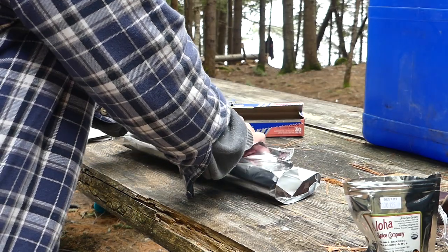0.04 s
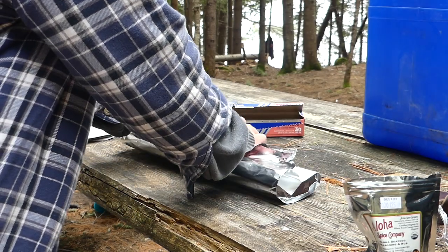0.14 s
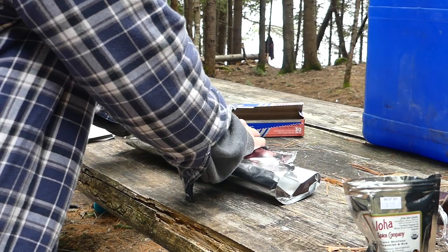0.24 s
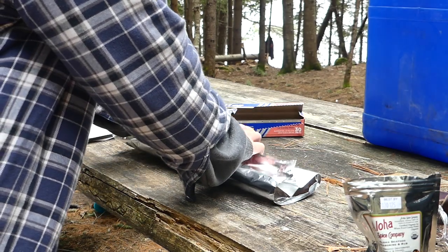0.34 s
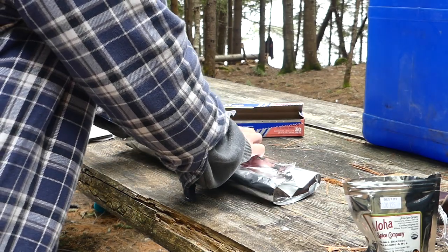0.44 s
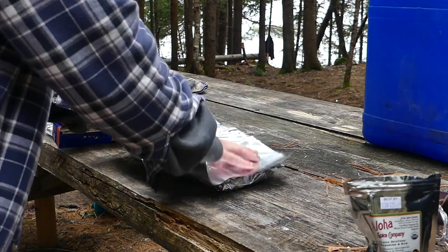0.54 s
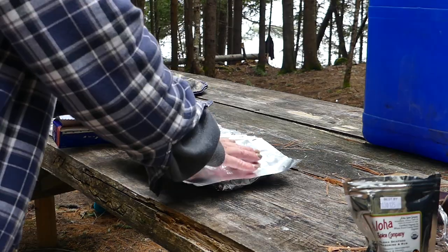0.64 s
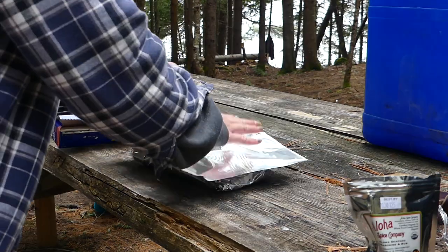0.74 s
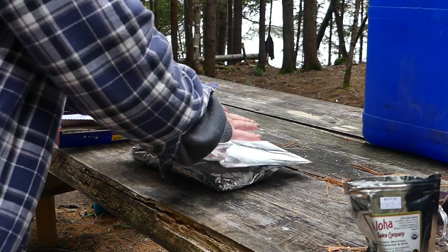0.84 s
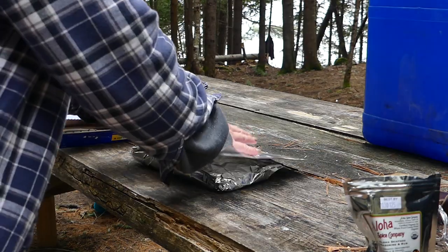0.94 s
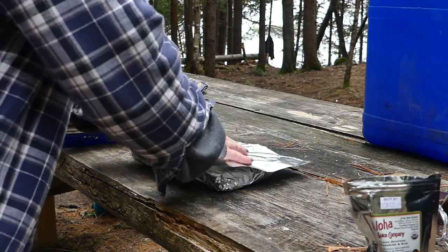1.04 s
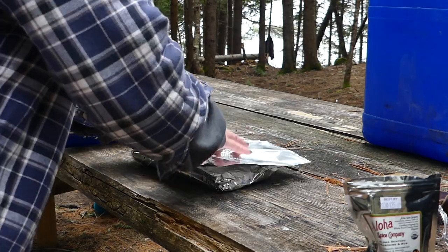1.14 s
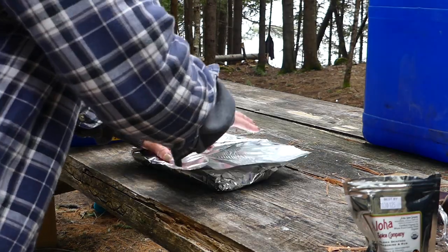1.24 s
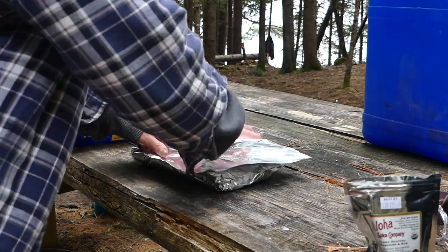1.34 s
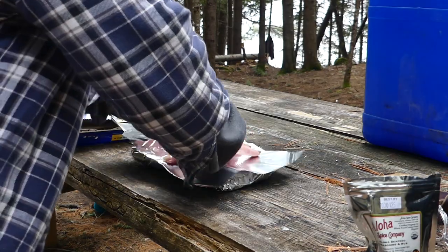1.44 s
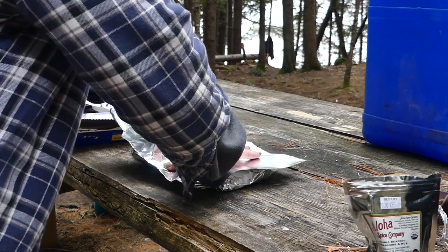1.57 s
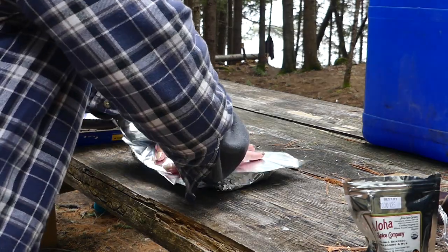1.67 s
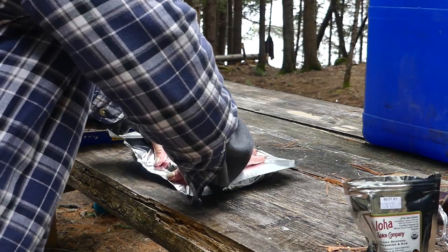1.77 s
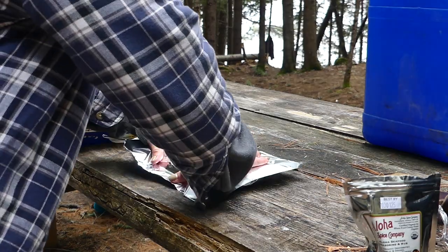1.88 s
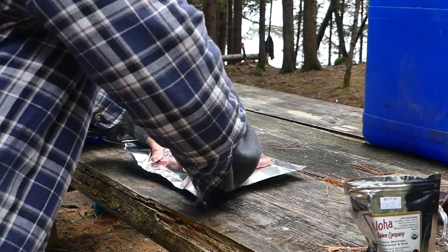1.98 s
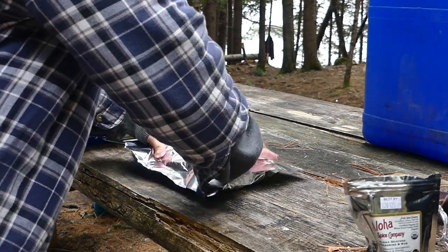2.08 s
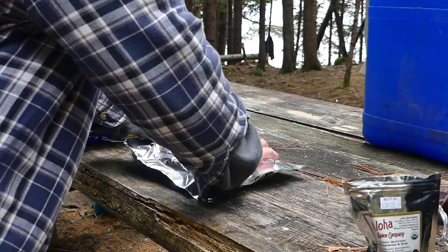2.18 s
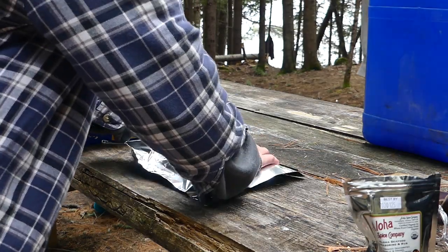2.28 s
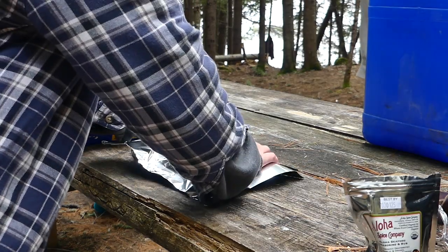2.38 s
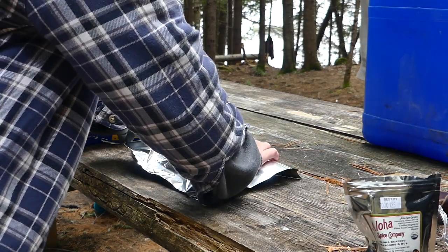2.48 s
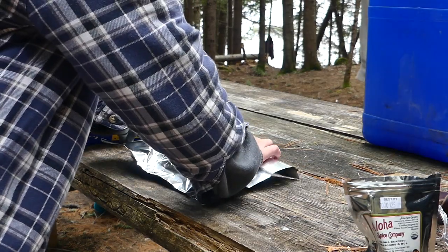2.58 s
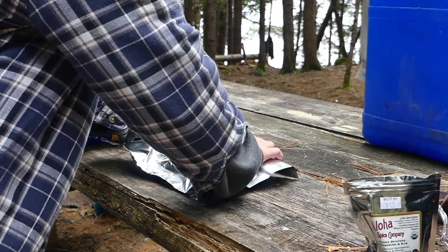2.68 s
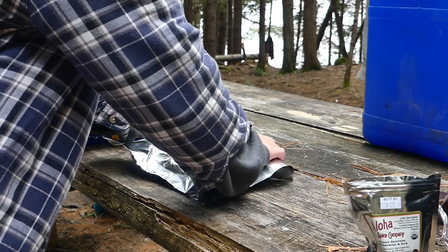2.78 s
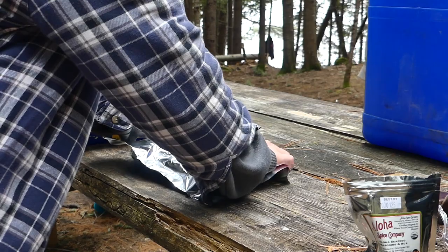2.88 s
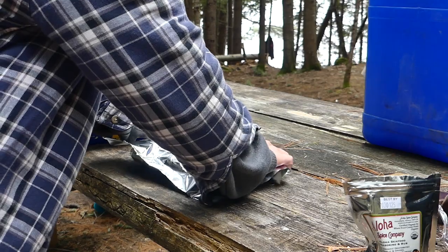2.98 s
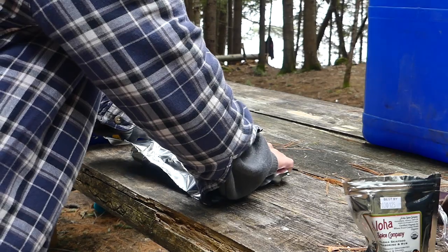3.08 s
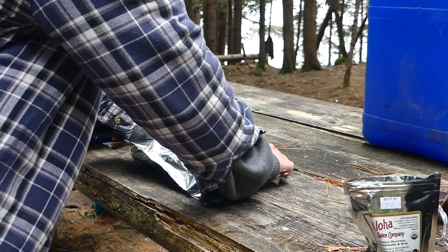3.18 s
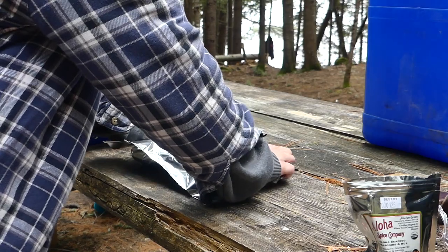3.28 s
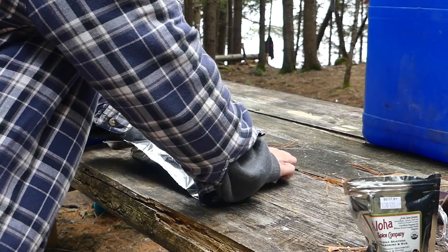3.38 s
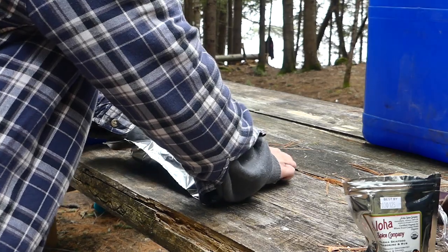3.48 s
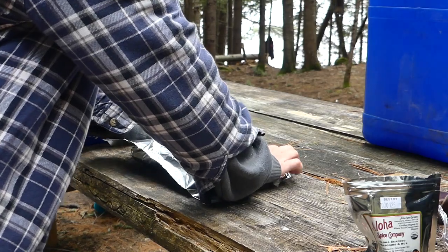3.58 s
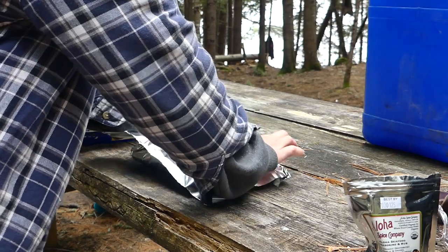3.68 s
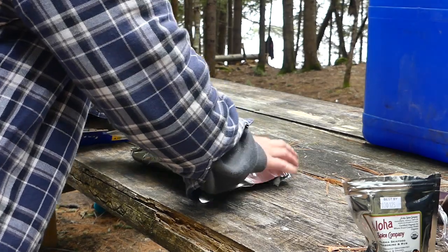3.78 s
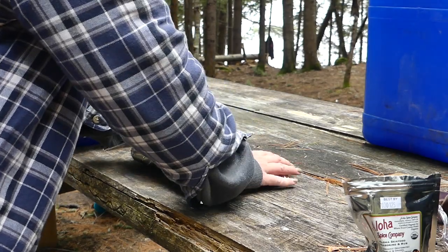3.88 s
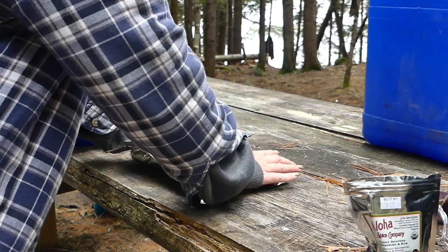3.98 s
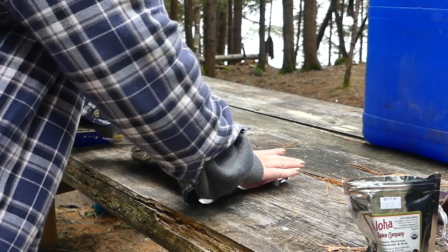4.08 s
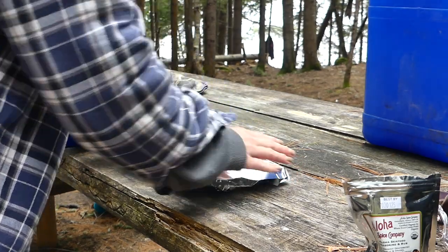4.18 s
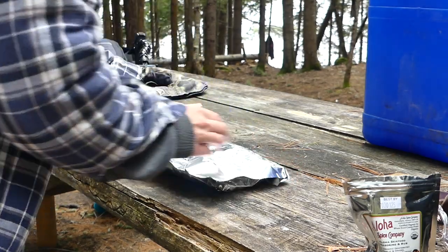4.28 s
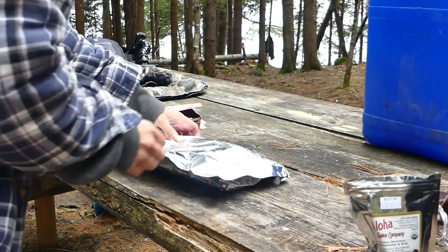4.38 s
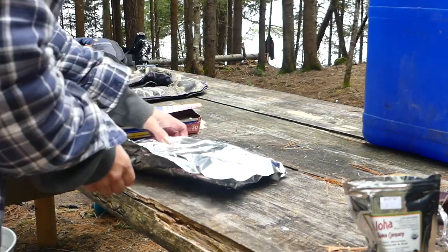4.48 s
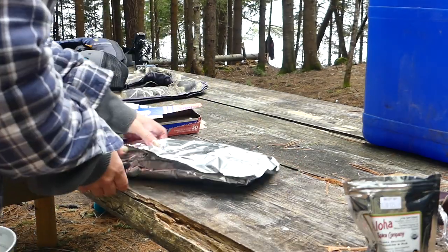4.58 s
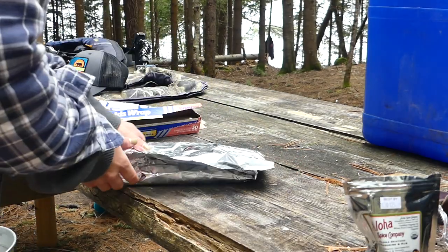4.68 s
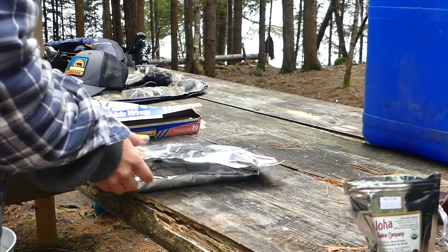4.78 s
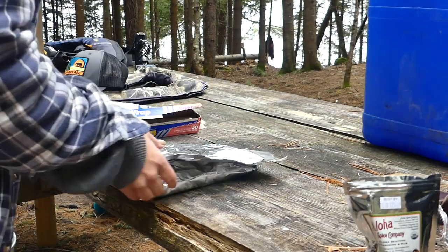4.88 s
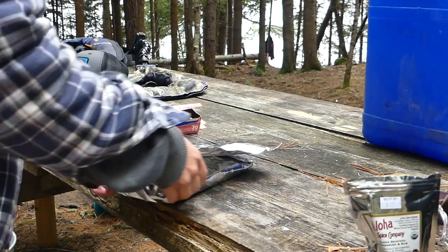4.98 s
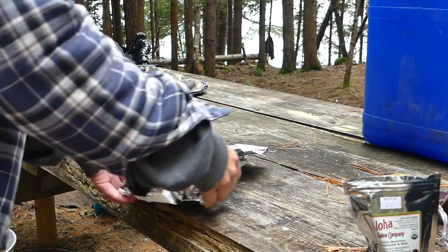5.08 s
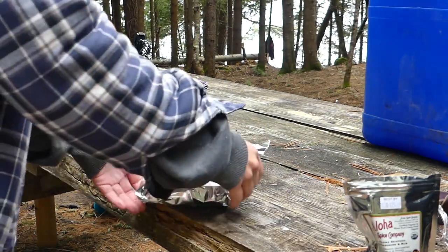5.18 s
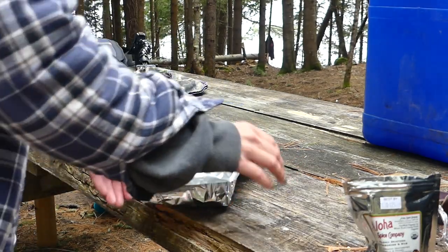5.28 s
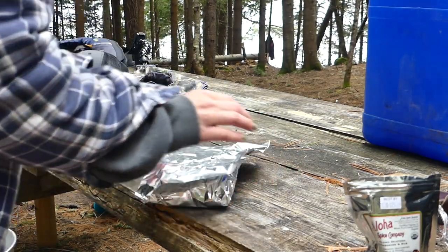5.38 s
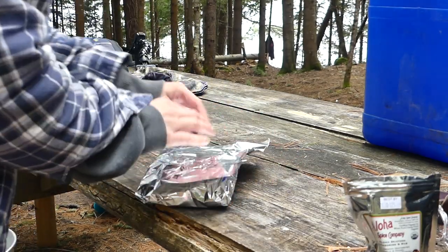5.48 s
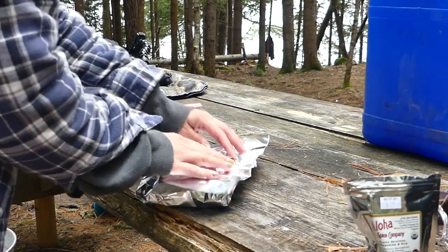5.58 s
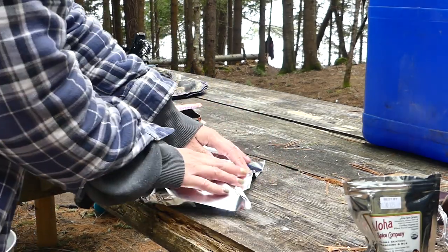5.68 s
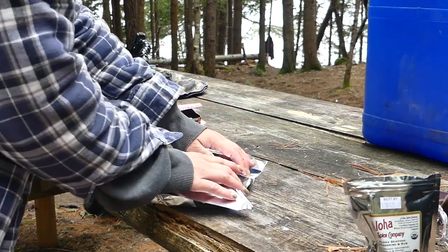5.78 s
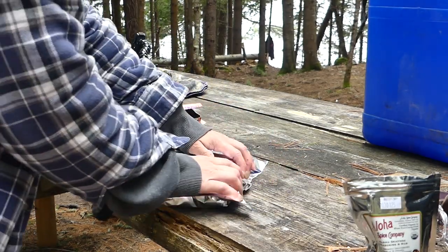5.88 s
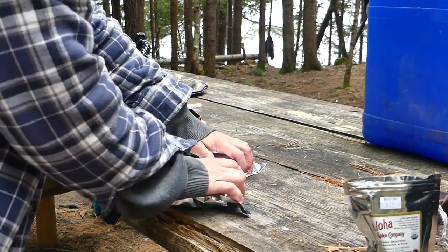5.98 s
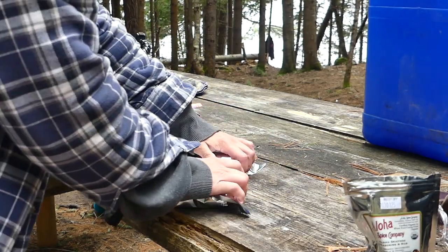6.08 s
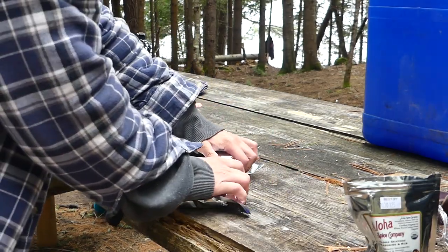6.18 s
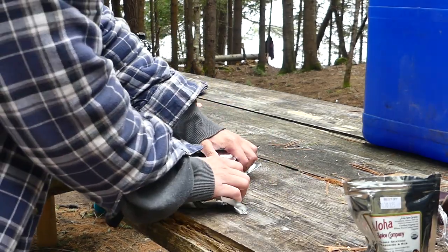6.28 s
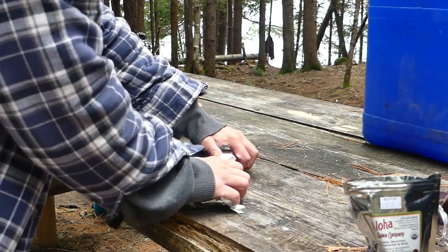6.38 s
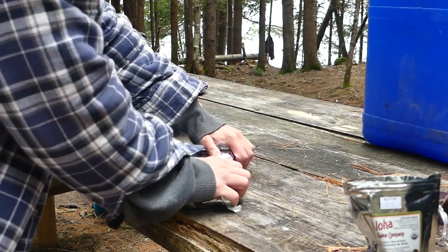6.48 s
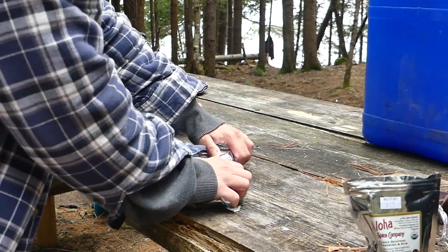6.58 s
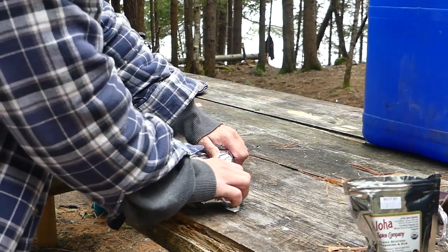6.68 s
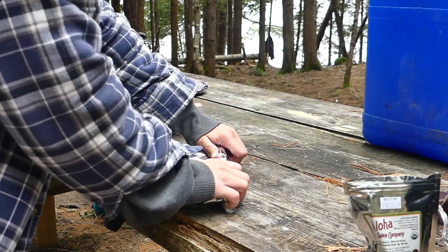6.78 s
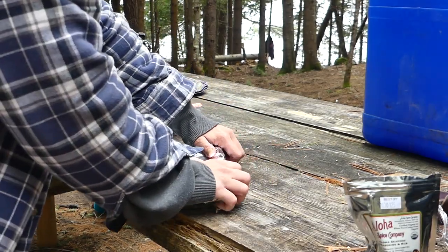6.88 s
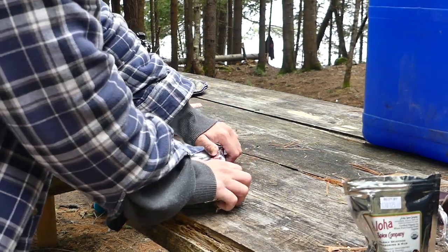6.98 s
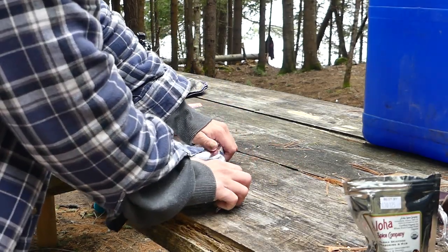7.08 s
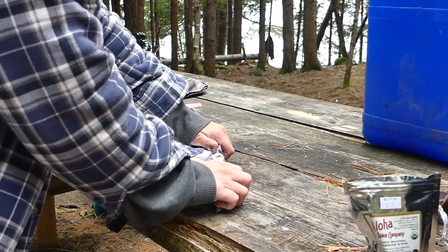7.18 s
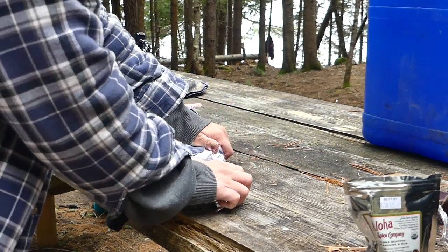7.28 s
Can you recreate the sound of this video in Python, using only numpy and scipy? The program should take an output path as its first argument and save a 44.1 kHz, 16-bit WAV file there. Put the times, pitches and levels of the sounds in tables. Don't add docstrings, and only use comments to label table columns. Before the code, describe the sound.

Close, crisp metallic foil crinkling with sharp creases and tiny pops, one flat slap on wood, over a very faint forest hush.

```python
import sys
import numpy as np
from scipy import signal
from scipy.fft import rfft, irfft
from scipy.io import wavfile
from scipy.ndimage import uniform_filter1d

SR = 44100
rng = np.random.default_rng(int(sys.argv[2]) if len(sys.argv) > 2 else 0)


def volts_from_decibels(level):
    exponent = np.asarray(level, float) / 20
    return 10 ** exponent


def generate_wav(sig):
    pcm = np.round(np.clip(np.atleast_2d(sig).T, -1, 1) * 32767).astype(np.int16)
    wavfile.write(sys.argv[1], SR, pcm)


N = 323694

# (frequency [Hz], level [dB])
FOREST_SPECTRUM = [(60, -21), (150, 0.5), (400, -1), (1400, -0.5), (3000, -18), (7000, -34), (12000, -34),
                   (16000, -26)]
# (time [s], level [dB])
WIND_LEVEL = [
    [(0.0, -83.5), (0.452, -94.5), (0.5, -67)],
    [(0.51, -65), (0.58, -47), (0.76, -70), (1.37, -46.5), (1.76, -63.5), (4.77, -48), (4.98, -54.5),
     (6.94, -46), (7.17, -58), (7.34, -47)],
]
# (frequency [Hz], level [dB])
WIND_SPECTRUM = [(12, -52.5), (20, 5), (47, -4.5), (130, -17.5), (170, -48), (290, -120)]
# (time [s], peak level [dB], frequency [Hz])
PALM_THUDS = [
    (1.071, -44.5, 203),
    (1.721, -48, 220.3),
    (3.832, -57, 132),
    (5.628, -43, 157.8),
]
# (time [s], level [dB], decay T60 [s])
SLAP_BLOW = [
    (5.2985, -10.5, 0.042),
]
# (frequency [Hz], level [dB])
SLAP_SPECTRUM = [(100, -11), (400, -8), (2400, -11), (7500, -4), (11000, -15), (16000, -12)]
# (frequency [Hz], level [dB])
RATTLE_MODES = [(830, -19), (1370, -9), (1690, -9), (2200, -16), (2540, 0), (3400, -3), (4480, 0),
                (5030, 3), (5620, -1), (6330, -3), (6960, -8), (8450, -3), (10070, -11), (13300, -10)]
# (frequency [Hz], level [dB])
SHEET_SPECTRUM = [(1500, -47), (2600, -14.5), (4200, -3.5), (5800, -6), (6400, -1.5), (7600, -0.5),
                  (8500, -1.5), (9100, -6), (13100, -4), (15500, -7.5)]
# (frequency [Hz], level [dB])
PACKET_SPECTRUM = [(150, -25), (300, -13.5), (640, -6.5), (820, -5), (950, -7.5), (1360, -3), (2200, -4),
                   (3200, -7), (5000, -14), (9000, -55.5)]
# (peak time [s], crackle level [dB], rise [s], fall [s])
HAND_GRIPS = [(0.025, -36, 0.17, 0.013), (0.06, -31.5, 0.11, 0.14), (0.152, -20.5, 0.028, 0.026),
              (0.214, -31, 0.0081, 0.092), (0.286, -35.5, 0.13, 0.013), (0.299, -32.5, 0.025, 0.1),
              (0.352, -28.0, 0.057, 0.1), (0.405, -33, 0.035, 0.025), (0.464, -41, 0.0082, 0.036),
              (0.511, -19.5, 0.0033, 0.13), (0.563, -16, 0.036, 0.09), (0.693, -28, 0.181, 0.13),
              (0.769, -31.5, 0.016, 0.074), (0.949, -23.5, 0.036, 0.25), (1.018, -20.5, 0.093, 0.31),
              (1.17, -33.5, 0.082, 0.059), (1.245, -34, 0.003, 0.066), (1.267, -31, 0.023, 0.09),
              (1.4, -34, 0.099, 0.065), (1.472, -21.5, 0.076, 0.11), (1.529, -27, 0.021, 0.087),
              (1.583, -34.5, 0.004, 0.53), (1.678, -25, 0.018, 0.037), (1.694, -23.5, 0.028, 0.13),
              (1.715, -23.5, 0.017, 0.021), (1.735, -24.0, 0.059, 0.053), (1.759, -27.5, 0.029, 0.051),
              (1.809, -29, 0.042, 0.029), (1.85, -27, 0.15, 0.029), (1.888, -27, 0.066, 0.056),
              (1.917, -27, 0.015, 0.056), (1.95, -30.5, 0.022, 0.37), (2.031, -34, 0.028, 0.016),
              (2.1, -29.5, 0.014, 0.025), (2.124, -35, 0.033, 0.035), (2.178, -29, 0.047, 0.28),
              (2.228, -21.5, 0.022, 0.022), (2.243, -27.5, 0.023, 0.069), (2.275, -25, 0.104, 0.016),
              (2.298, -28, 0.033, 0.031), (2.317, -28.5, 0.028, 0.022), (2.334, -30, 0.036, 0.19),
              (2.39, -30.5, 0.026, 0.19), (2.427, -28, 0.024, 0.19), (2.515, -37, 0.017, 0.03),
              (2.575, -36.5, 0.015, 0.1), (2.6, -43, 0.233, 0.01), (2.634, -30.5, 0.078, 0.026),
              (2.671, -39, 0.007, 0.015), (2.728, -31, 0.035, 0.364), (2.825, -32.5, 0.0074, 0.057),
                  (2.856, -29, 0.055, 0.05), (2.911, -33.5, 0.11, 0.037), (2.956, -31.5, 0.015, 0.28),
                  (3.022, -37, 0.01, 0.053), (3.074, -37.0, 0.038, 0.41), (3.158, -31.0, 0.017, 0.015),
                  (3.193, -31.5, 0.017, 0.15), (3.272, -37, 0.052, 0.053), (3.314, -32.0, 0.017, 0.023),
                  (3.39, -39.5, 0.594, 0.023), (3.413, -34.5, 0.02, 0.039), (3.437, -34.0, 0.017, 0.029),
                  (3.468, -39, 0.004, 0.02), (3.52, -31.5, 0.021, 0.054), (3.555, -32.5, 0.037, 0.027),
                  (3.602, -38, 0.048, 0.031), (3.634, -36.5, 0.0091, 0.09), (3.722, -34.5, 0.158, 0.082),
                  (3.79, -38, 0.063, 0.072), (3.824, -30.5, 0.0066, 0.2), (3.871, -27.5, 0.075, 0.077),
                  (3.93, -32, 0.027, 0.046), (3.975, -28, 0.059, 0.03), (4.004, -40, 0.011, 0.015),
                  (4.043, -35.0, 0.069, 0.22), (4.173, -37.5, 0.013, 0.028), (4.21, -34, 0.004, 0.063),
                  (4.269, -35, 0.0088, 0.015), (4.325, -32.5, 0.05, 0.044), (4.367, -29, 0.0053, 0.065),
                  (4.437, -26.0, 0.11, 0.025), (4.457, -28.5, 0.027, 0.043), (4.498, -27, 0.079, 0.023),
                  (4.513, -30.5, 0.017, 0.012), (4.578, -22.5, 0.14, 0.041), (4.606, -23.5, 0.036, 0.049),
                  (4.631, -23, 0.044, 0.066), (4.682, -21.5, 0.16, 0.14), (4.745, -21.0, 0.24, 0.05),
                  (4.784, -28, 0.02, 0.007), (4.813, -24.5, 0.047, 0.17), (4.877, -23.5, 0.22, 0.027),
                  (4.935, -32.5, 0.038, 0.04), (4.98, -27, 0.095, 0.17),
              (5.021, -30, 0.032, 0.018), (5.038, -28, 0.032, 0.26), (5.175, -31, 0.086, 0.048),
                   (5.273, -39, 0.004, 0.095), (5.31, -48, 0.0043, 0.52), (5.582, -34, 0.006, 0.5),
                   (5.64, -25, 0.043, 0.18), (5.707, -23.0, 0.091, 0.025), (5.729, -27, 0.015, 0.027),
                   (5.789, -30, 0.037, 0.076), (5.82, -24.5, 0.024, 0.072), (5.893, -28.5, 0.14, 0.068),
                   (5.947, -27, 0.035, 0.063), (5.971, -29.5, 0.0091, 0.051), (6.01, -30, 0.093, 0.011),
                   (6.048, -27.5, 0.103, 0.038), (6.067, -23, 0.034, 0.07), (6.104, -26.5, 0.018, 0.042),
                   (6.126, -29, 0.027, 0.075), (6.177, -28.5, 0.028, 0.059), (6.237, -28.5, 0.032, 0.016),
                   (6.262, -31, 0.067, 0.09), (6.29, -31.5, 0.027, 0.037), (6.324, -26.5, 0.026, 0.02),
                   (6.342, -32.0, 0.01, 0.072), (6.395, -26, 0.059, 0.018), (6.408, -31.5, 0.007, 0.12),
                   (6.448, -27, 0.14, 0.097), (6.534, -26.5, 0.088, 0.029), (6.558, -29, 0.05, 0.016),
                   (6.636, -34, 0.14, 0.015), (6.724, -26, 0.11, 0.12), (6.75, -30.5, 0.034, 0.18),
                   (6.816, -24, 0.078, 0.046), (6.855, -32.5, 0.01, 0.049), (6.905, -31.5, 0.008, 0.017),
                   (6.994, -24.5, 0.076, 0.027), (7.025, -31, 0.005, 0.04), (7.063, -37, 0.029, 0.044),
                   (7.164, -27.5, 0.083, 0.037), (7.196, -32, 0.034, 0.093), (7.238, -32, 0.011, 0.053),
                   (7.285, -30, 0.0035, 0.022), (7.335, -34.5, 0.0085, 0.022)]
# (time [s], knock relative to crackle [dB])
HAND_WEIGHT = [(0, -1.5), (.49, -3.5), (.52, -10), (.85, -9.5), (1.3, -7.5), (2.25, -6), (2.32, -3),
               (3.6, -2.5), (4.3, -6), (4.65, -3.5), (5.05, 2), (5.25, -5), (5.6, -6.5), (6.3, -4),
               (6.8, -4), (7.34, -4)]
# (time [s], peak level [dB], knock relative to ring [dB], brightest tone
# [Hz])
CREASE_SNAPS = [(0.1493, -5.5, -35, 7514), (0.2104, -25, -6, 3460), (0.402, -19.5, -13, 3310),
                (0.5195, -4, -28, 7820), (0.9383, -18, -26, 7050), (1.242, -20, -26, 8100),
                (1.2662, -15, -19, 6852), (1.4988, -10, -20.5, 7900), (1.8074, -7, -28, 7784),
                (1.914, -7.5, -22, 8700), (2.0322, -21, -6, 7600), (2.0691, -17.5, -18, 7220),
                (2.4258, -8.5, -0.5, 2020), (2.5404, -29, -9, 8070), (2.599, -14.5, -18, 6870),
                (2.6682, -18, -21, 7244), (2.725, -24.5, -9, 7250), (2.7996, -17, -22, 7780),
                (2.9554, -11, -31, 7500), (3.0318, -17, -14, 4300), (3.0452, -29, -7, 2922),
                (3.157, -19, -8, 7910), (3.1904, -28, -3, 7514), (3.255, -19, -11, 7470),
                (3.314, -25, -16, 8300), (3.434, -27, -16, 7800), (3.467, -13, -14.5, 6700),
                (3.8217, -25, -3, 8100), (3.968, -18, -25, 7010), (4.2087, -31, -24, 7650),
                (4.2237, -23, -23.5, 7662), (4.3022, -21, -10, 7030), (4.373, -18, -15, 7145),
                   (4.4366, -17, -7, 4462), (4.5573, -12, -19.5, 8050), (4.9773, -21, 4.5, 7610),
                   (5.5565, -35, -6.5, 4800), (5.7056, -12, -21, 8124), (5.7294, -19, -25, 7990),
                   (5.8932, -12, -8, 7541), (5.972, -12.5, -17.5, 7293), (5.992, -17, -10, 2970),
                   (6.0263, -12, -21, 6900), (6.123, -16, -16.5, 7264), (6.1774, -14, -19, 4070),
                   (6.2622, -17, -31, 7440), (6.3228, -11.5, -16.5, 7770), (6.3912, -15, -16.5, 7150),
                   (6.429, -13, -12, 4630), (6.5188, -8, -18.5, 6900), (6.559, -18, -14, 7820),
                   (6.789, -3, -33, 6500), (6.8505, -24.5, -4.5, 4330), (6.8899, -18, -23, 7704),
                   (6.9643, -18, -1.5, 7436), (7.0235, -20, -16, 7384), (7.1468, -15, -11, 7220),
                   (7.1935, -18, -25, 7300), (7.2855, -17, -12, 8060), (7.3218, -32, -2, 3950),
                (0.4643, -27, -11, 2710), (1.9264, -17, -4, 8330), (2.2243, -13, -16, 7100),
                 (2.6968, -26, -6, 7250), (3.3837, -23, -17, 3560), (3.4474, -20, -15, 7350),
                 (3.482, -22, -10, 7620), (3.4894, -24, -17, 5370), (3.504, -18, -12, 7510),
                 (3.5394, -25, -13, 2780), (3.599, -32, -15, 8080), (3.6326, -24, -15, 7470),
                 (3.7494, -26, -15, 6840), (4.0023, -22, -20, 8580), (4.1664, -26, -18, 7130),
                 (4.2647, -27, -17, 8270), (4.2892, -29, -15, 7430), (4.3135, -26, -18, 7790),
                 (4.3635, -19, -13, 7170), (4.583, -9, -19, 7960), (5.1552, -26, -13, 8270),
                 (5.6604, -8, -15, 7930), (5.677, -11, -10, 7850), (5.7763, -13.5, -22, 8230),
                 (5.816, -11.5, -10, 7040), (5.9155, -20, -15, 7530), (6.1314, -17, -15, 7440),
                 (6.1699, -15, -15, 4150), (6.3126, -13, -18, 7210), (6.343, -16, -18, 7420),
                 (6.6807, -23, -15, 7800), (6.7075, -18, -11, 4390), (6.9027, -14, -22, 7600),
                 (6.927, -28, -10, 3130), (7.0324, -17, -17, 7370), (7.1077, -27, -13, 8050),
                 (7.1234, -19, -9, 3080), (7.1616, -11.5, -22, 2560)]
# (start [s], length [s], level [dB], first tone [Hz], last tone [Hz])
AIR_SQUEEZES = [
    (4.353, 0.14, -39, 1307, 1370),
    (4.586, 0.26, -33.5, 1306, 1420),
    (4.976, 0.12, -41, 1680, 1420),
]
# (level [dB], decay T60 [s], frequency [Hz], bandwidth [Hz])
FOLD_SHIVER = (-16, .13, 6900, 1500)
# (time [s], peak level [dB], frequency [Hz])
DENT_POPS = [(0.429, -21, 851.5), (2.512, -23, 806.4), (2.541, -19, 1523), (2.726, -23, 1140),
             (2.835, -20, 1430), (2.892, -18, 1470), (2.541, -17, 2500), (2.905, -24, 2070),
             (3.046, -17, 1930), (3.12, -21, 1310), (3.154, -20, 1319), (6.38, -17, 1630),
             (6.558, -22, 852.7), (6.849, -19.5, 1390), (6.97, -17, 1523), (7.145, -17, 1630),
             (1.4665, -24, 3620), (1.6735, -23, 3730), (1.875, -18, 1950), (1.9134, -25, 1580),
                 (2.033, -20, 1430), (2.1639, -27, 1560), (2.2227, -20, 3000),
             (3.1893, -26, 1740), (3.2123, -25, 1410), (3.4677, -23, 1360), (3.5191, -23, 1680),
                  (3.538, -27, 1440), (3.8222, -18, 1340), (3.8688, -18, 1560), (4.3148, -21, 1510),
             (5.6462, -15, 3800), (5.6677, -17, 3860), (5.7909, -24.5, 3890), (6.0658, -14, 1700),
                   (6.1012, -20, 2970), (6.169, -26, 4180), (6.314, -17, 1740), (6.3801, -17, 1650),
                   (6.4095, -16, 3820), (6.4284, -17, 2450), (6.5172, -17, 4410), (6.5587, -18, 3780),
                   (6.7064, -15, 4500), (6.8487, -13, 1390), (6.9268, -22, 1580), (6.948, -21, 1760),
                   (7.1234, -22, 3070), (7.1454, -22, 1550), (7.1608, -17, 2560), (7.283, -29, 1480)]
# (frequency [Hz], threshold [standard deviations])
PARTING_THRESHOLD = [(100, -.5), (900, 0), (2500, .9), (8000, 1.7), (16000, 1.)]

MEAN_DB, KNOCK_SHARE = -35, 0.86


def evened(x):
    return x / np.sqrt(np.mean(x ** 2, axis=-1, keepdims=True) + 1e-20)


def placed(s, sound):
    return np.pad(sound, (round(s * SR), N))[:N]


def curve(rows, column):
    rows = np.vstack(rows)
    return np.interp(np.arange(N) / SR, rows[:, 0], rows[:, column])


def colour(x, points, size=4096):
    f, db = np.transpose(points)
    hz = abs(np.fft.fftfreq(size, 1 / SR))
    log_gain = np.log(volts_from_decibels(np.interp(np.log(hz + 1), np.log(f + 1), db)))
    taps = np.fft.ifft(np.exp(np.conj(signal.hilbert(log_gain)))).real
    return signal.oaconvolve(x, taps / np.linalg.norm(taps))[:len(x)]


def slow(hz):
    return evened(signal.lfilter(*signal.butter(2, hz, fs=SR), rng.standard_normal(N)))


def resonate(x, hz, width):
    turn = np.exp(2j * np.pi * np.cumsum(hz) / SR)
    r = np.exp(-np.pi * width / SR)
    return 2 * (turn * signal.lfilter([1 - r], [1, -r], x / turn)).real


def rings(t60, hz, bump_db, uneven_db, tail_db, tail_t60, snap, size=2048):
    t, f = np.arange(size) / SR, np.fft.rfftfreq(size, 1 / SR)
    noise, lumps = rng.standard_normal((len(t60), 2, size)).transpose(1, 0, 2)
    lumps = evened(uniform_filter1d(uniform_filter1d(lumps, size=14), size=14))[:, :len(f)]
    bump = bump_db * np.exp(-(np.log2((f + 1) / hz[:, None]) / 0.2) ** 2)
    noise = evened(irfft(rfft(noise) * volts_from_decibels(uneven_db * lumps + bump)))
    onset = 1 + snap * volts_from_decibels(-60 * t / 0.0008)
    decay = volts_from_decibels(-60 * t / t60[:, None])
    tail = volts_from_decibels(tail_db - 60 * t / tail_t60)
    return .5 * noise * (onset * decay + tail)


def forest():
    return volts_from_decibels(-49.5 + 1.2 * slow(7.8)) * colour(rng.standard_normal(N), FOREST_SPECTRUM)


def wind():
    rumble = colour(rng.standard_normal(N), WIND_SPECTRUM, size=16384)
    return volts_from_decibels(curve(WIND_LEVEL, column=1) + 2.5 * slow(23.0)) * rumble


def trees(x):
    hz, t, z = signal.stft(rng.standard_normal(SR // 2), SR, nperseg=256)
    t60 = .33 - 0.014 * hz[:, None] / 1000
    tail = signal.istft(z * volts_from_decibels(-60 * t / t60), SR, nperseg=256)[1]
    return signal.oaconvolve(x, tail / np.linalg.norm(tail))[:N]


def thuds():
    lead_s = .03
    t = np.arange(4096) / SR - lead_s
    swell = np.exp(-((t - .012) / 0.01447) ** 2)
    return sum(placed(s - lead_s, volts_from_decibels(db) * np.sin(2 * np.pi * hz * t) * swell) for s, db, hz in PALM_THUDS)


def slap():
    s, blow_db, t60 = SLAP_BLOW[0]
    t = np.arange(8192) / SR
    closing = t < .0028
    shape = .6 * closing + .3 * (t < .0072) + volts_from_decibels(-17 - 60 * t / t60)
    noise = colour(shape * rng.standard_normal(len(t)), SLAP_SPECTRUM)
    rattle = -sum(volts_from_decibels(db) * np.sin(2 * np.pi * hz * t) for hz, db in RATTLE_MODES) * closing
    u = (t - .00015) / .00008
    push = (2 * u ** 2 - 1) * np.exp(-u ** 2)
    blow = volts_from_decibels(-2.0) * noise + volts_from_decibels(-6.5) * rattle + push
    band = signal.butter(2, [130, 14000], "band", fs=SR)
    return placed(s, volts_from_decibels(blow_db) * signal.lfilter(*band, blow))


def air(rub):
    first, last = round(4.2 * SR), round(5.3 * SR)
    t, rub, out = np.arange(first, last) / SR, rub[first:last], 0
    width, rise_s, fall_s = 330, 0.012, 0.01464
    second = .45 * evened(resonate(rub, 2000 + 0 * t, 110))
    for s, length, db, from_hz, to_hz in AIR_SQUEEZES:
        hz = np.interp(t, [s, s + length], [from_hz, to_hz])
        edge = np.minimum((t - s) / rise_s, 0) + np.minimum((s + length - t) / fall_s, 0)
        hollow = evened(resonate(resonate(rub, hz, width), hz, width))
        out = out + volts_from_decibels(db + 20 * edge) * (hollow + second)
    return placed(first / SR, out)


def shiver():
    db, t60, hz, width = FOLD_SHIVER
    start_s, hold_s, rise_s = 6.8105, .009, 0.0012
    t = np.arange(8192) / SR
    tone = hz + 0 * t
    ring = evened(resonate(resonate(rng.standard_normal(len(t)), tone, width), tone, width))
    decay = volts_from_decibels(db - 60 * np.maximum(t - hold_s, 0) / t60)
    return placed(start_s, decay * np.minimum(t / rise_s, 1) * ring)


def popping():
    t = np.arange(2048) / SR
    t60, rise = 0.028, np.minimum(t / 0.001082, 1)
    out = 0
    for s, db, hz in DENT_POPS:
        decay = volts_from_decibels(db - 6.0 - 60 * t / t60 * np.sqrt(hz / 1400))
        out = out + placed(s, decay * rise * np.sin(2 * np.pi * hz * t))
    return out


def dents():
    per_s, cycles = 300, 12
    size = volts_from_decibels(3. * np.minimum(rng.exponential(1, N), 3)) * (rng.random(N) < per_s / SR)
    walls_hz = np.geomspace(600, 3000, num=16)
    wall = rng.integers(0, len(walls_hz), N)
    out = 0
    for k, hz in enumerate(walls_hz):
        r, turn = volts_from_decibels(-60 * hz / cycles / SR), 2 * np.pi * hz / SR
        poles = [1, -2 * r * np.cos(turn), r ** 2]
        out = out + signal.lfilter([np.sin(turn) * np.sqrt(hz)], poles, size * (wall == k))
    return evened(out)


def hands():
    t = np.arange(0, N, 32) / SR
    grips = HAND_GRIPS
    s, db, rise, fall = np.transpose(grips)[:, :, None]
    drop_db = 20 * np.maximum((s - t) / rise, (t - s) / fall)
    power = (volts_from_decibels(db - drop_db) ** 2).sum(axis=0) + volts_from_decibels(-80) ** 2
    return np.interp(np.arange(N) / SR, t, 10 * np.log10(power))


def buckles(hands_db):
    starts = (rng.random(N) < 40. / SR) * rng.exponential(1, N)
    avalanche = signal.lfilter([1], [1, -np.exp(-1 / (0.016 * SR))], starts)
    rate = 2500 * (0.8 + 0.6 * avalanche) * volts_from_decibels(np.clip(.8 * (hands_db + 32), 0, 10))
    coarse_db = np.clip(4.3 - .27 * abs(hands_db + 34), 1.2, 5)
    size = volts_from_decibels(coarse_db * np.minimum(rng.exponential(1, N), 4)) * (rng.random(N) < rate / SR)
    patch_hz = np.geomspace(600, 15000, num=40)
    patch_t60 = .008 * rng.uniform(.4, 2, len(patch_hz))
    shapes = rings(patch_t60, patch_hz, bump_db=11., uneven_db=3., tail_db=-17, tail_t60=.05, snap=.8)
    patch = rng.integers(0, len(shapes), N)
    crackle = sum(signal.oaconvolve(size * (patch == k), shape)[:N] for k, shape in enumerate(shapes))
    level = np.sqrt(uniform_filter1d(uniform_filter1d(crackle ** 2, size=650), size=650) + 1e-12)
    still = np.clip((-41 - hands_db) / 5, 0, 1)
    settling = evened(signal.lfilter(*signal.butter(1, 5000, fs=SR), rng.standard_normal(N)))
    return np.sqrt(1 - still) * crackle / level + np.sqrt(still) * settling


def creases(hands_db):
    where, tone, size = rng.random((110, 3)).T
    at_hand = hands_db[(where * (N - 1)).astype(int)]
    stray_db = MEAN_DB + 0.7 * (at_hand - MEAN_DB) + 8 * (.5 + size)
    strays = [where * (N - 1) / SR, stray_db, -4 - 13.5 * tone, 2900 * 5 ** tone]
    marked = np.transpose(CREASE_SNAPS)
    s, peak_db, knock_db, hz = np.hstack([marked, strays])
    base_t60 = np.where(np.arange(len(s)) < marked.shape[1], .011, .010)
    t60 = base_t60 * 2 ** rng.uniform(-0.47, 0.52, len(s))
    shapes = rings(t60, hz, bump_db=9, uneven_db=2.5, tail_db=-22, tail_t60=.06, snap=1.2)
    shapes = shapes / abs(shapes).max(axis=1, keepdims=True)
    ring, knock = np.zeros((2, N + 4096))
    for at, db, rel_db, shape in zip(np.round(s * SR).astype(int), peak_db, knock_db, shapes):
        ring[at:at + len(shape)] += volts_from_decibels(db - 1.5) * shape
        knock[at:at + len(shape)] += volts_from_decibels(db + rel_db + 7.5) * shape
    return ring[:N], knock[:N]


def muffled(ring):
    low = signal.filtfilt(*signal.butter(2, 9400, fs=SR), ring)
    top_db = -0.28 * (curve(HAND_WEIGHT, column=1) + 7)
    return low + volts_from_decibels(top_db) * (ring - low)


def foil():
    hands_db = hands()
    crackle = buckles(hands_db)
    rub = evened(crackle + 0.72 * rng.standard_normal(N))
    ring, knock = creases(hands_db)
    ring = ring + crackle * volts_from_decibels(hands_db + 0.56)
    knock_db = MEAN_DB + KNOCK_SHARE * (hands_db - MEAN_DB) + curve(HAND_WEIGHT, column=1) - 3.0
    knock = knock + (rub + volts_from_decibels(-9) * dents()) * volts_from_decibels(knock_db)
    knock = colour(knock, PACKET_SPECTRUM)
    modes = resonate(knock, np.full(N, 800), 180.0) + resonate(knock, np.full(N, 1450), 58.0)
    sheet = muffled(colour(ring, SHEET_SPECTRUM))
    return sheet + knock + 0.11 * modes + air(rub) + shiver() + popping()


def scene():
    near = foil() + slap()
    echo = volts_from_decibels(-20) * trees(near)
    mid = near + echo + thuds() + forest() + wind()
    return np.array([mid, mid])


def parted(mid):
    hz, _, z = signal.stft(mid, SR, nperseg=1024)
    chance = rng.standard_normal(z.shape[::-1]).T
    patches = uniform_filter1d(uniform_filter1d(chance, size=2), size=24, axis=0)
    chance = evened(patches + 0.24 * chance[0])
    f, threshold = np.transpose(PARTING_THRESHOLD)
    open_patch = chance > np.interp(hz, f, threshold)[:, None]
    phase = np.exp(2j * np.pi * rng.random(z.shape[::-1]).T)
    return signal.istft(z * open_patch * phase, SR, nperseg=1024)[1][:N]


def band_limit(x):
    return signal.sosfilt(signal.butter(12, 16470, fs=SR, output="sos"), x)


def record(dry):
    stereo = dry + volts_from_decibels(-13.5) * parted(dry[0]) * np.array([[1], [-1]])
    notched = signal.lfilter(*signal.iirnotch(5940, 45., fs=SR), stereo)
    low_pass = signal.firwin(255, 15600, window=("kaiser", 9), fs=SR)
    limited = signal.oaconvolve(notched, low_pass[None], "same")
    finished = np.clip(limited, -.97, .97)
    return band_limit(finished)


dry = scene()
out = record(dry)
generate_wav(out)
```